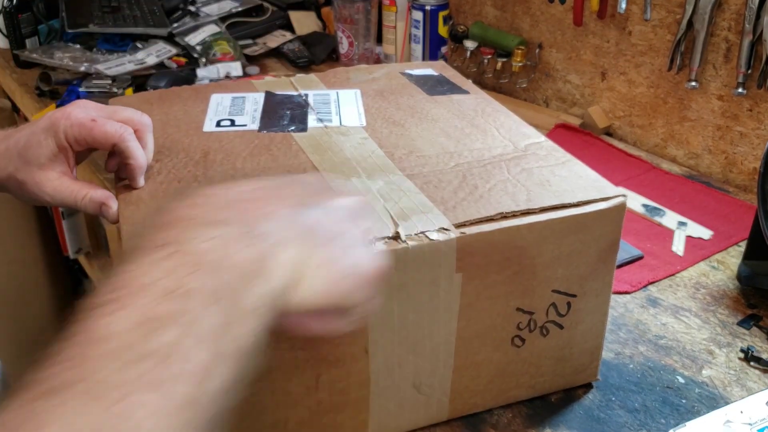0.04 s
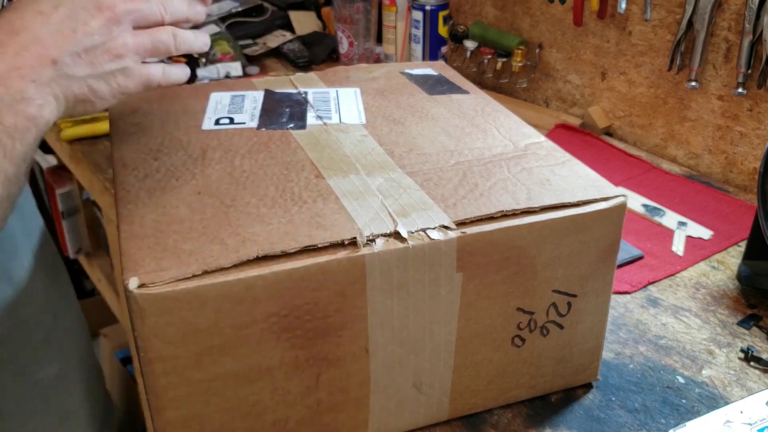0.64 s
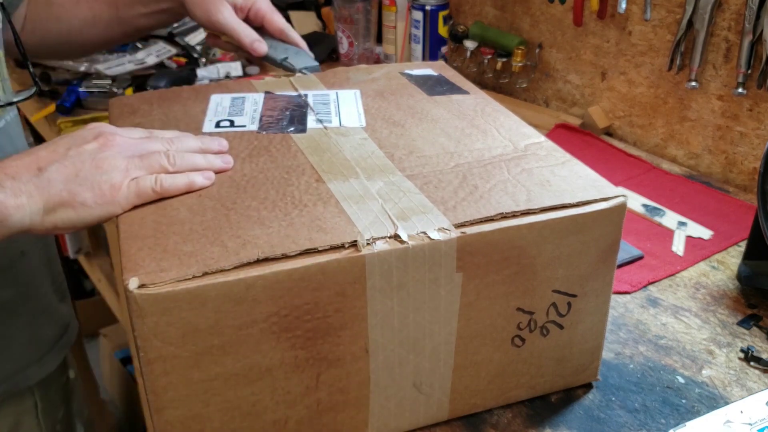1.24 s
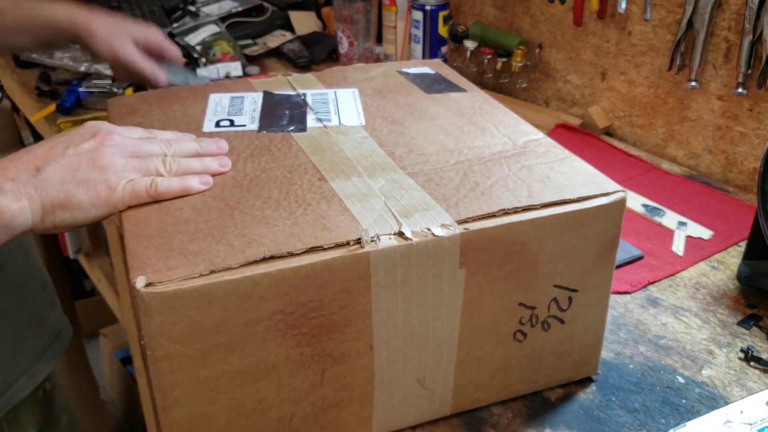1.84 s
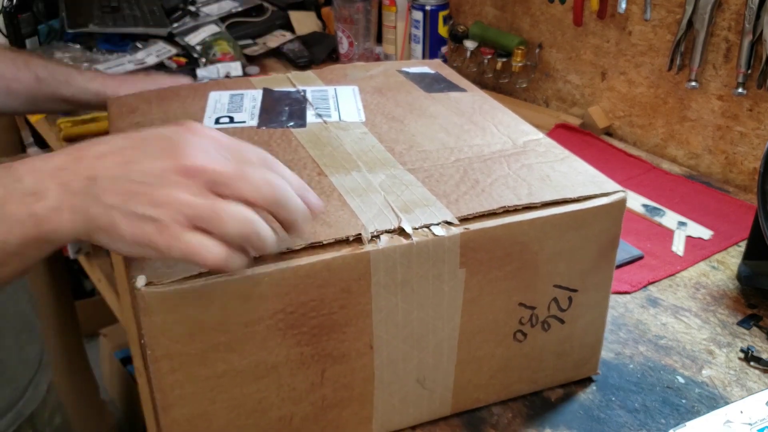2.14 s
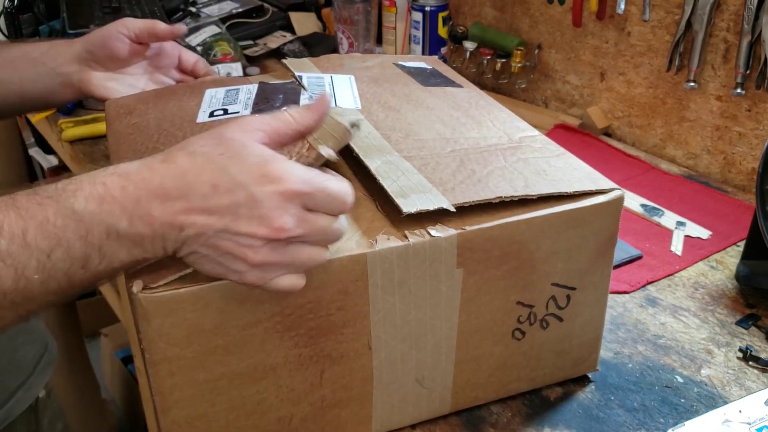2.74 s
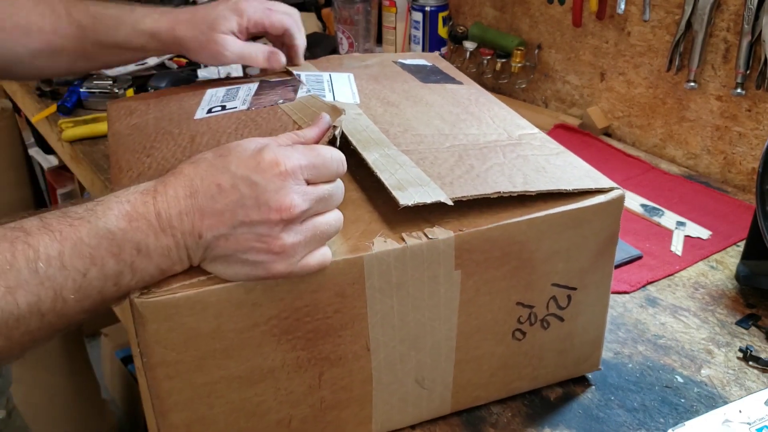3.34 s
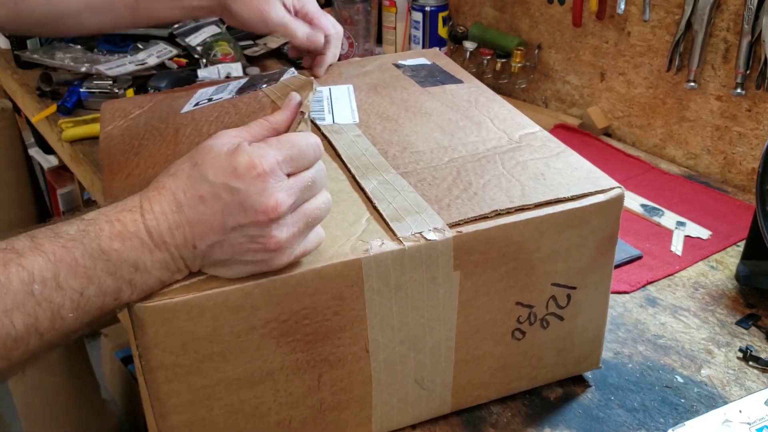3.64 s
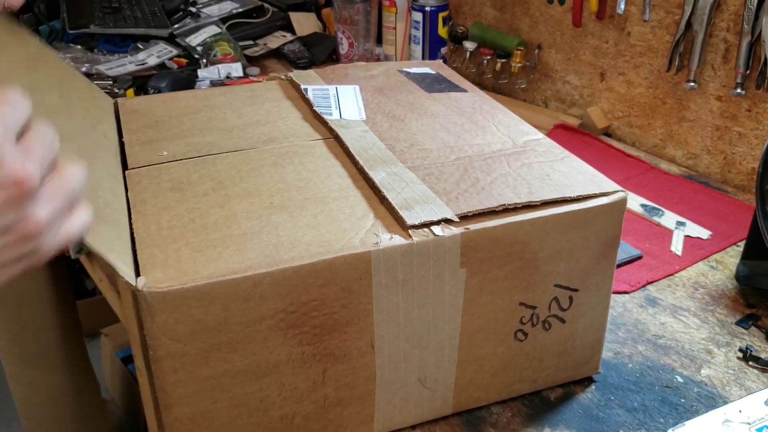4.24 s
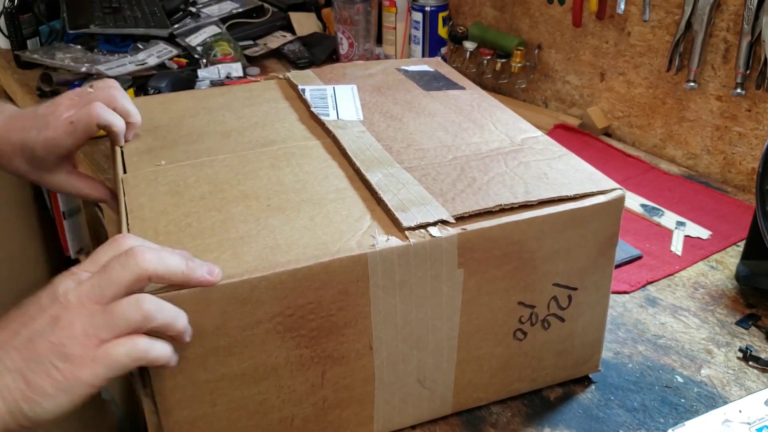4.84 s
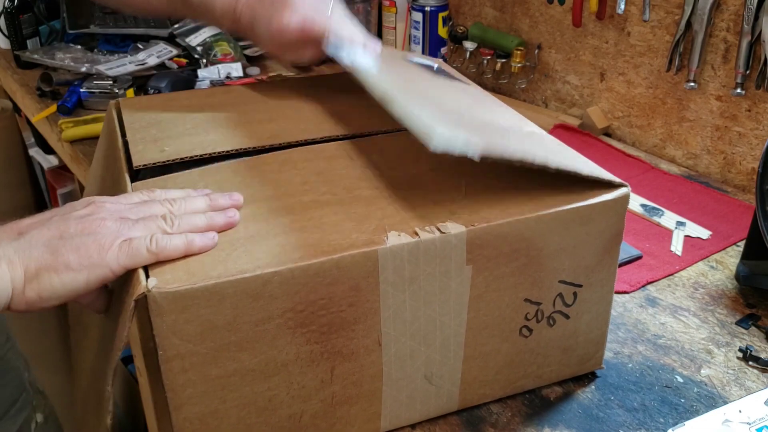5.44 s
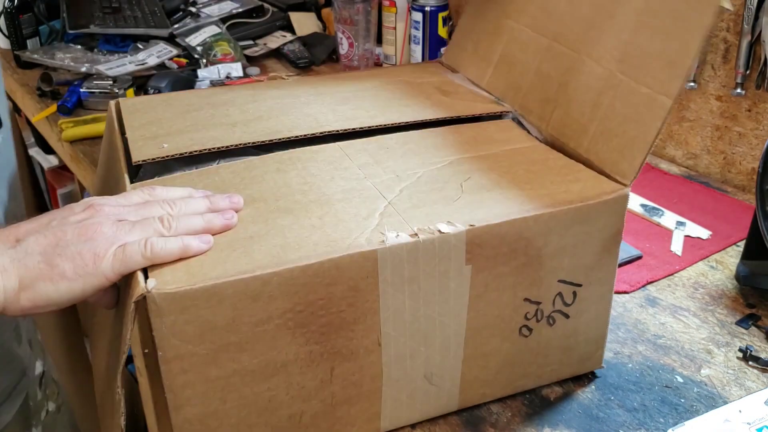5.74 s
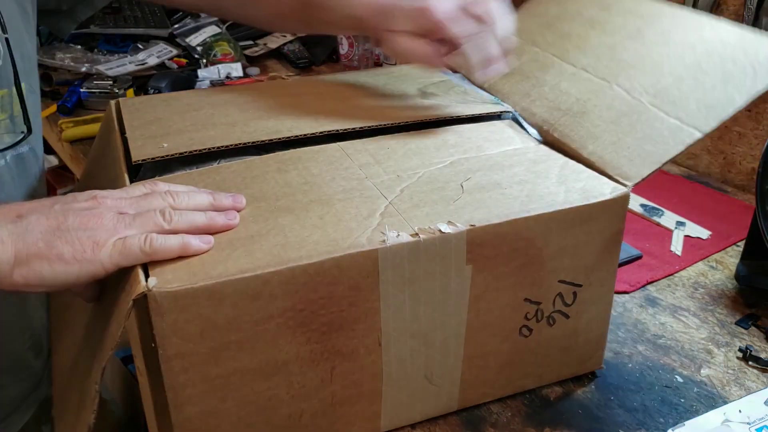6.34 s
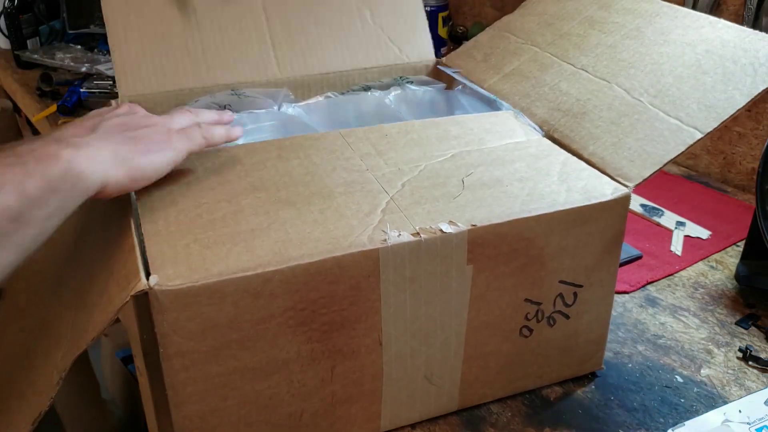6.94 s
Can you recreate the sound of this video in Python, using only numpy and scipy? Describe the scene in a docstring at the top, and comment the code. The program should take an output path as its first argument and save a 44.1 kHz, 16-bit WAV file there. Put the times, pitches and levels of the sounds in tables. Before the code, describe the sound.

Close by, a cardboard box is cut and pulled open, with snapping tape, a dropped knife, sliding hands, hollow thumps and faint plastic rustling.

```python
"""Opening a cardboard box

In a small workshop, close by, a utility knife slits the tape at both ends of a box, clicks in the
hand and is dropped on the wooden bench. The last tape snaps as the flaps are pulled up. Sliding
hands hiss and scrape, creases crack as fibres break, and each push makes the hollow box thump.
Near the end, plastic packing crinkles inside."""
import sys
import numpy as np
from scipy import signal
from scipy.fft import rfft, irfft, next_fast_len
from scipy.io import wavfile
from scipy.ndimage import uniform_filter1d

SR = 44100
rng = np.random.default_rng(int(sys.argv[2]) if len(sys.argv) > 2 else 0)


def int16_out(signal):
    """Quantize to a 16-bit WAV file."""
    q = np.round(np.clip(np.atleast_2d(signal).T, -1, 1) * 32767)
    wavfile.write(sys.argv[1], SR, q.astype(np.int16))


N = 313110

# Levels in the tables are relative: the functions add their own gains.
# Blade pulls. Each row: start and length in seconds, board rasp in dB, tape rip in dB.
BLADE_PULLS = [(-.005, 0.17, -41, -35), (.035, 0.044, -26, -38.5), (1.488, .13, -31.5, -38.5)]
# Tape and creases snapping. Each row: time in seconds, level, brightness and hardness in dB,
# fade time in seconds.
BOX_SNAPS = [(0.02, -39.5, -6, 1, .0027), (0.062, -31, -4.5, -2.5, 0.0038), (0.0823, -22.5, -2, 1, .002),
             (0.244, -48, -0.5, 2.5, 0.00057), (1.5118, -32.5, -4.5, 7, .004),
             (1.564, -33.5, 2.5, 0, 0.0048), (1.602, -33.5, 3.5, 3, .005), (2.55, -53, -3.5, 5, .0024),
             (2.982, -52, 2.5, 3.5, .006), (3.464, -51, -3.5, -1, .0025), (3.5202, -26.5, -6, 0.5, 0.005),
             (3.648, -39, 1, 1, 0.00078), (3.743, -52.5, -14.5, -2, .006), (3.79, -23, -2, 3.5, .0007),
             (4.358, -45, -2, 6, 0.0081), (4.415, -46.5, 2, -1.5, .0028), (4.499, -48.5, -5, -3.5, 0.0028),
             (4.831, -48, -0.5, -0.5, 0.0019), (4.8395, -42.5, 1.5, -3, 0.00056),
             (4.872, -31, 0.5, -4.5, 0.0015), (5.2157, -41.5, 5, 0, 0.0014), (5.235, -43, -5, -4, .0045),
             (5.422, -40.5, -2.5, -2, 0.017), (5.447, -30, -1.5, -0.5, 0.0019),
             (5.4818, -33, 0, -1, 0.00073), (5.488, -37.5, 0, 0.5, .002), (5.5202, -33.5, 0, 9.5, 0.0029),
             (6.5, -44, 3.5, -3, 0.0097), (6.593, -46.5, -1, 2, 0.0067)]
# Pushes on the box. Each row: time in seconds, level in dB, push length in seconds, pitch ratio.
BOX_PUSHES = [(.044, -25, 0.00083, 1), (0.078, -27, .0011, 1), (1.565, -33.5, 0.00064, 1.1),
              (2.128, -46, 0.01, 1.1), (2.18, -32, 0.011, 1.24), (2.33, -32, 0.0034, 1.15),
              (2.406, -32, 0.0033, 1.08), (2.997, -41.5, 0.028, .99), (3.32, -51, 0.0016, 1.03),
              (3.806, -20.5, 0.0014, 1), (4.2, -43.5, 0.0084, 0.79), (4.368, -41.5, 0.017, .99),
              (5.418, -34, 0.0066, 1), (6.493, -35.5, .0025, 1), (6.631, -37.5, 0.0056, 0.92),
              (6.892, -23.5, 0.06, .72)]
# Hands and flaps sliding. Each row: start and length in seconds, then hiss, scrape and rumble in dB.
SLIDES = [(.17, 0.064, -75, -68, -55.5), (.94, 0.18, -70, -75.5, -67), (1.4, 0.069, -60, -63, -75),
          (1.462, .03, -72, -53, -53), (1.63, 0.11, -77, -62, -54), (1.985, 0.031, -50, -76.5, -62.5),
          (2.38, .07, -53.5, -49.5, -38), (2.5, .65, -61, -65.5, -51), (2.675, 0.023, -48, -66, -63),
          (2.825, 0.12, -56, -67, -73), (3.085, 0.032, -57, -53, -63), (3.175, 0.019, -45.5, -52.5, -39.5),
          (3.325, 0.08, -64, -76, -60), (3.45, 0.1, -55.5, -56.5, -49), (3.57, 0.34, -58, -51.5, -48.5),
          (3.88, 0.099, -58.5, -53.5, -40), (4, 0.24, -62.5, -69, -51), (4.27, 0.11, -52, -83, -64),
          (4.5, 0.066, -52.5, -59, -48.5), (4.655, 0.245, -58.5, -72, -50),
          (4.89, .17, -54.5, -54.5, -49.5), (5.09, 0.081, -66, -71, -70),
          (5.168, 0.032, -51.5, -59.5, -69.5), (5.255, .18, -49.5, -51.5, -44),
          (5.54, 0.17, -54.5, -56.5, -58), (5.76, 0.2, -57.5, -63, -59), (6.245, 0.048, -66, -79, -67),
          (6.485, .16, -48, -48, -44.5), (6.68, 0.3, -56, -53.5, -54.5), (7.005, 0.17, -61, -52, -63)]
# Where the sliding hand is. Each row: time in seconds, left minus right in dB.
HAND_POSITION = [(0, -2), (1.6, 7.5), (2., 6), (2.5, -0.5), (3.2, 3.5), (3.8, -3.5), (4.3, 7.5), (4.6, 4.5),
                 (5.3, 0.5), (7.1, 1)]
# The knife clicking. Each row: time in seconds, level in dB.
KNIFE_CLICKS = [(0.584, -60), (.639, -37), (0.6511, -32), (0.667, -56), (0.689, -43.5), (.947, -54.5),
                (2.128, -46)]
# The knife landing. Each row: time in seconds, wood level in dB, metal level in dB, fade in seconds.
KNIFE_BOUNCES = [(2.1877, -22.5, -30.5, 0.0012), (2.191, -23.5, -30.5, .003), (2.1971, -19.5, -21, 0.0056),
                 (2.249, -27.5, -37, 0.0084), (2.27, -20.5, -25.5, 0.0029), (2.327, -32.5, -47, 0.049)]
# Plastic creases popping. Each row: time in seconds, level in dB.
PLASTIC_POPS = [(6.426, -58.5), (6.466, -59), (6.48, -58), (6.74, -55), (6.823, -59), (7.004, -48),
                (7.02, -55), (7.081, -45)]
# Plastic shifting. Each row: start and length in seconds, level in dB.
PLASTIC_RUSTLES = [(6.6, 0.33, -55), (6.77, 0.029, -47), (6.995, .12, -51)]

# The notes each object rings with. Each row: pitch in Hz, level in dB, seconds to fade by 60 dB.
BOX_NOTES = [(75.45, 2.5, 0.37), (89.8, -4.5, 0.37), (121.6, 2.5, 0.2), (142.9, 1, 0.23), (198, -4, 0.22),
             (247.6, -5, 0.12), (297, -10, 0.31), (438, -16.5, 0.24), (520, -9.5, 0.23)]
FLAP_NOTES = [(520, 0.5, 0.09), (620, -6, 0.061), (977, -1, 0.1), (1296, 0.5, .06), (1850, -9, 0.11),
              (2670, -3, 0.038)]
KNIFE_NOTES = [(1617, -5.5, .1), (1980, 0, 0.19), (2030, -9, .14), (2310, -9, 0.18), (3980, 1, 0.2),
               (4300, 2, 0.14), (5110, -2.5, .12), (9600, -2.5, .12), (11100, 4.5, 0.13), (11400, -2, .12),
               (12100, 2.5, 0.087)]
BENCH_NOTES = [(248, -8.5, 0.076), (322, 1.5, 0.089), (358, -3.5, 0.65), (414, -12.5, 0.28),
               (550, -15, 0.18), (573, -2.5, 0.21), (685, -17.5, 0.17), (1030, -14, .1), (1230, -10, 0.073)]

# The tone of each noise, from bass to treble. Each row: frequency in Hz, level in dB.
ROOM_TONE = [(15, -37), (25, -0.5), (82, 4), (134, -11.5), (344, -16.5), (1040, -21.5), (1290, -16),
             (2050, -11.5), (2220, -10), (3080, -25.5), (3920, -21), (5140, -26), (10400, -28.5),
             (11900, -27.5), (16000, -26.5)]
KNOCK_TONE = [(60, -27.5), (150, -3), (330, -0.5), (520, 0), (750, -5.5), (1100, -11.5), (1800, -17.5),
              (4000, -39.5)]  # cardboard or wood
RIP_TONE = [(500, -2.5), (1200, -0.5), (2400, 1.5), (3500, -1.5), (6000, -4), (9500, 0.5), (13000, -1),
            (16000, -17)]  # tape, fibres and plastic
CRACK_TONE = [(400, -23), (900, -2.5), (1400, -1), (2000, -0.5), (2700, -1), (3500, -4.5), (5000, -11.5),
              (8000, -7), (16000, -34.5)]  # the hard middle of a snap
FIZZ_TONE = [(1500, -30.5), (3500, -13), (5500, 6.5), (8000, 8), (12000, 5.5), (16000, -4.5)]  # the treble of fibres and plastic
SKIN_TONE = [(500, -33), (1500, -13), (3000, -10.5), (5500, -13.5), (8000, -0.5), (11000, 1.5), (14000, 2),
             (16000, -6)]
SCRAPE_TONE = [(100, -11.5), (220, -6), (450, 3.5), (800, -4.5), (1300, -5.5), (2200, -7), (4000, -12),
               (8000, -30.5), (16000, -49)]
CLICK_TONE = [(700, -46), (1250, -20.5), (1500, 12.5), (2000, -1), (3100, -16), (4400, 4), (6000, -4),
              (8200, -16), (11500, 4.5), (13500, -7.5), (16000, -11.5)]  # the knife in the hand
RATTLE_TONE = [(300, -13), (700, 1), (1200, -3), (2000, -1.5), (2700, 2), (3400, -14.5), (6000, -8.5),
               (10000, -14.5), (16000, -18)]  # the blade as the knife lands

# The workshop's echo. Each row: frequency in Hz, nearby reflections in dB, room echo in dB,
# seconds to fade by 60 dB, likeness of left and right from 0 to 1.
ROOM_ECHO = [(80, -15.5, -15, 0.47, 1), (300, -7, -7.5, 0.4, 0.7), (900, -9, -6, 0.41, 0),
             (2500, -4, -5, 0.4, 0.03), (6200, 2, -3, 0.38, 0), (14000, 1, -3.5, 0.22, 0)]
# The lean to the left. Each row: frequency in Hz, left minus right in dB.
LEFT_LEAN = [(60, 1), (250, 2.5), (600, 3.5), (1200, 6.5), (2800, 8), (5000, 6.5), (8000, 4), (14000, 0)]

TIME = np.arange(N) / SR
HIT_TIME = TIME[:16384]  # the clock for one short sound, or "hit"
LEAD_S = 0.025  # time allowed for a hit to build up
HIT_AGE = HIT_TIME - LEAD_S


def gain(db):
    """Turn decibels into a number to multiply by."""
    return 10 ** (np.asarray(db) / 20)


def unit(x):
    """Scale a sound to an average (rms) level of 1."""
    return x / np.sqrt(np.mean(x ** 2))


def at_level(x, db, window_s=0.008):
    """Scale a hit so that its loudest moment has this rms level."""
    power = uniform_filter1d(x ** 2, int(window_s * SR), mode="constant")
    return x * gain(db) / np.sqrt(power.max())


def look_up(points, hz, column=1):
    """Read a table at any frequency, blending between rows on a pitch scale."""
    table = np.array(points, float)
    return np.interp(np.log(hz + 1), np.log(table[:, 0]), table[:, column])


def colour(x, tone, size=4096):
    """Filter a sound to give it the tone in a table."""
    log_gain = np.log(gain(look_up(tone, np.fft.rfftfreq(size, 1 / SR))))
    cepstrum = np.fft.irfft(log_gain)
    # Fold the second half onto the first, so the filter never sounds before its input.
    cepstrum[1:size // 2] *= 2
    cepstrum[size // 2 + 1:] = 0
    response = irfft(np.exp(rfft(cepstrum)))[:size // 2]
    return signal.fftconvolve(x, response)[:len(x)]


def add(track, when, hit):
    """Mix in a hit so that its build-up ends at the given time."""
    start = int((when - LEAD_S) * SR)
    hit = hit[max(-start, 0):max(N - start, 0)]
    start = max(start, 0)
    track[start:start + len(hit)] += hit


def ring(force, notes, pitch=1):
    """A force sets fading notes ringing. Pitched down, as in a slack box, they die sooner."""
    hold = min(pitch, 1) ** 3
    response = sum(gain(db - 60 * HIT_TIME / (fade * hold)) * np.cos(2 * np.pi * hz * pitch * HIT_TIME)
                   for hz, db, fade in notes)
    return signal.fftconvolve(force, response)[:len(force)]


def grains(per_second, spread_db, size=N):
    """Tiny slips and breaks at random moments, a few much larger than the rest."""
    strength = gain(spread_db * np.minimum(rng.exponential(size=size), 4))
    happens = rng.random(size) < per_second / SR
    return unit(happens * strength * rng.choice([-1, 1], size))


def burst(fade_s):
    """A quick run of tiny breaks or knocks that builds up, peaks and dies out."""
    from_peak = np.where(HIT_AGE < 0, -HIT_AGE / 0.74, HIT_AGE)
    return grains(12000, 3, size=len(HIT_AGE)) * np.exp(-from_peak / fade_s)


def flutter(fade_s):
    """The uneven shaking that follows a blow."""
    return rng.standard_normal(len(HIT_AGE)) * (HIT_AGE > 0) * np.exp(-np.abs(HIT_AGE) / fade_s)


def push(length_s):
    """One smooth pulse of force; longer sounds softer."""
    age = np.maximum(HIT_AGE, 0) / (length_s / 4)
    return age * np.exp(-age)


def waver(per_second, depth_db):
    """A volume that wanders at random."""
    steps = rng.standard_normal(4096)
    return gain(depth_db * np.interp(TIME * per_second, np.arange(len(steps)), steps))


def movements(table, column, attack_s=0.017, release_s=0.016, sag_db=4.5):
    """The volume of hand movements: each gets going, eases off and coasts to a stop."""
    volume = np.zeros(N)
    for row in table:
        start, length = row[:2]
        span = slice(*np.searchsorted(TIME, [start, start + length + 10 * release_s]))
        age = TIME[span] - start
        edges = np.minimum(age / attack_s, 1) * np.exp(-np.maximum(age - length, 0) / release_s)
        volume[span] += edges * gain(row[column] - sag_db * np.minimum(age / length, 1))
    return volume


def room_noise():
    """A faint, steady background with some hiss, partly shared by both sides."""
    shared, left, right = (unit(colour(rng.standard_normal(N), ROOM_TONE)) for _ in range(3))
    return gain(-64.5) * (0.5 * shared + 0.64 * np.array([left, right]))


def knife_cuts(stop_s=0.0086):
    """The blade jerks through tape and fibres; the panel under it rasps and booms."""
    tearing = grains(9000, 1.8) * unit(waver(220, 0.99))
    rasp = gain(-6) * unit(colour(tearing, KNOCK_TONE))
    boom = gain(-3.5) * unit(ring(tearing, BOX_NOTES))
    rip = gain(-1) * unit(colour(tearing, RIP_TONE))
    board_volume, tape_volume = (movements(BLADE_PULLS, column, release_s=stop_s) for column in (2, 3))
    return board_volume * (rasp + boom) + tape_volume * rip


def snaps():
    """Breaking tape or fibres crack and fizz, knock the panel and ring the flap and the box."""
    out = np.zeros(N)
    for when, db, bright_db, hard_db, fade_s in BOX_SNAPS:
        force = burst(fade_s)
        shaking = force + gain(-13) * flutter(0.018)
        knock = at_level(colour(shaking, KNOCK_TONE), db - bright_db - 1.44)
        crack = at_level(colour(force, CRACK_TONE), db + hard_db - 4)
        fizz = at_level(colour(force, FIZZ_TONE), db + bright_db - 0.5)
        pitch = 1 + 0.04 * rng.standard_normal()  # shifts with the place that cracks
        flap = at_level(ring(force, FLAP_NOTES, pitch), db + hard_db - 11)
        add(out, when, knock + crack + fizz + flap)
        boom = at_level(ring(push(0.003), BOX_NOTES), db - bright_db - 3.5)
        add(out, when + 0.004, boom)  # the panel springs back
    return out


def thumps():
    """Palms and flaps push the hollow box; its pitch depends on the grip and how open it is."""
    out = np.zeros(N)
    for when, db, length_s, pitch in BOX_PUSHES:
        add(out, when, at_level(ring(push(length_s), BOX_NOTES, pitch), db + 3))
    return out


def sliding():
    """Skin hisses over the board and loose fibres tick; flaps catch and slip, shaking the box."""
    hiss = gain(0.5) * unit(colour(grains(20000, 1.1), SKIN_TONE)) * waver(70, 3.7)
    ticks = gain(-10) * unit(colour(grains(per_second=64, spread_db=3.4), RIP_TONE))
    slips = grains(5000, 4.3) * waver(60, 3)
    scrape = gain(0.5) * unit(colour(slips, SCRAPE_TONE))
    rumble = gain(-4.5) * unit(ring(grains(1500, 2.7), BOX_NOTES))
    skin, grip, shake = (movements(SLIDES, column) for column in (2, 3, 4))
    rubbing = skin * (hiss + ticks) + grip * scrape + shake * rumble
    pan_db = np.interp(TIME, *np.array(HAND_POSITION).T)
    return rubbing * gain(np.array([pan_db, -pan_db]) / 2)


def knife_clicks():
    """The metal knife clicks as the hand moves it."""
    out = np.zeros(N)
    for when, db in KNIFE_CLICKS:
        force = burst(0.0009) + gain(-23) * flutter(0.0056)
        add(out, when, at_level(colour(force, CLICK_TONE), db - 4.5))
    return out


def knife_ring():
    """The knife's metal shell rings after each click; the grip shifts its pitch a little."""
    out = np.zeros(N)
    for when, db in KNIFE_CLICKS:
        force = burst(0.00027)
        pitch = 1 + 0.018 * rng.standard_normal()
        add(out, when, at_level(ring(force, KNIFE_NOTES, pitch), db - 11))
    return out


def knife_drop():
    """The knife lands and rocks on the wooden bench with its blade rattling."""
    out = np.zeros(N)
    for when, wood_db, metal_db, fade_s in KNIFE_BOUNCES:
        force = burst(fade_s) + gain(-15.5) * flutter(0.028)
        wood = at_level(colour(force, KNOCK_TONE), wood_db - 4.5)
        metal = at_level(colour(force, RATTLE_TONE), metal_db)
        add(out, when, wood + metal)
    return out


def bench_ring():
    """The knife's first landing sets the bench top ringing."""
    out = np.zeros(N)
    when, wood_db, _, _ = KNIFE_BOUNCES[0]
    add(out, when, at_level(ring(push(0.00072), BENCH_NOTES), wood_db + 1.5))
    return out


def plastic():
    """Thin film crinkles and ticks as the inner flaps lift; larger creases pop one by one."""
    crinkle = unit(colour(grains(2300, 4.8), RIP_TONE))
    ticks = gain(-0.5) * unit(colour(grains(per_second=88, spread_db=3.3), FIZZ_TONE))
    out = gain(-3.5) * (crinkle + ticks) * movements(PLASTIC_RUSTLES, column=2)
    for when, db in PLASTIC_POPS:
        add(out, when, at_level(colour(burst(0.0017), RIP_TONE), db + 1.5))
    return out


def linger(power, seconds):
    """Let energy leak away; more seconds make it last longer."""
    keep = np.exp(-1 / (seconds * SR))
    return signal.lfilter([1 - keep], [1, -keep], power)


def workshop(x, bands=13):
    """Add the echo: sound scatters off box and bench, then lingers in the room as fading noise."""
    size = next_fast_len(N + 4096)
    log_hz = np.log(np.fft.rfftfreq(size, 1 / SR) + 1)
    centres = np.geomspace(60, 15000, bands)
    source = rfft(x.mean(axis=0), size)
    noise = rfft(rng.standard_normal((3, size)))
    likeness = look_up(ROOM_ECHO, np.exp(log_hz), column=4)
    sides = np.sqrt(likeness) * noise[0] + np.sqrt(1 - likeness) * noise[1:]
    out = x.copy()
    for hz, this_band in zip(centres, np.eye(bands)):
        near_db, room_db, fade_s = (look_up(ROOM_ECHO, hz, column) for column in (1, 2, 3))
        share = np.interp(log_hz, np.log(centres), this_band)
        power = irfft(source * np.sqrt(share), size)[:N] ** 2
        near = gain(2 * near_db) * linger(power, 0.002 + 0.5 / hz)
        tail = gain(2 * room_db) * linger(linger(power, 0.0022), fade_s / (2 * np.log(1000)))
        band_noise = irfft(sides * share, size)[:, :N]
        out += np.sqrt((near + tail) / share.mean()) * band_noise
    return out


def scene():
    """The box is opened a little to the left of the microphone."""
    direct = knife_cuts() + sliding() + snaps() + thumps() + knife_clicks() + knife_drop() + plastic()
    left, right = workshop(direct) + knife_ring() + bench_ring()
    left = colour(left, [(hz, db / 2) for hz, db in LEFT_LEAN])
    right = colour(right, [(hz, -db / 2) for hz, db in LEFT_LEAN])
    right = np.roll(right, shift=3)  # reaches the right side 3 samples later
    return np.array([left, right]) + room_noise()


def record(dry):
    """Drop the deepest bass and cut the highest treble."""
    bass_cut = signal.butter(6, 42, "high", fs=SR, output="sos")
    treble_cut = signal.ellip(10, 0.1, 80, 16000, fs=SR, output="sos")
    return signal.sosfilt(treble_cut, signal.sosfilt(bass_cut, dry))


dry = scene()
out = record(dry)
int16_out(out)
```